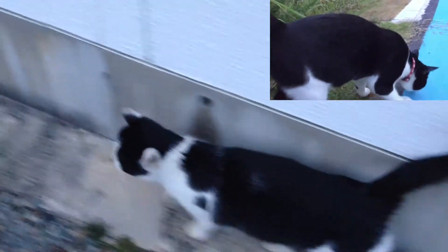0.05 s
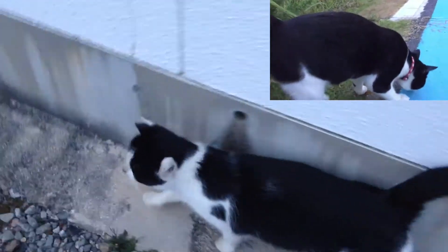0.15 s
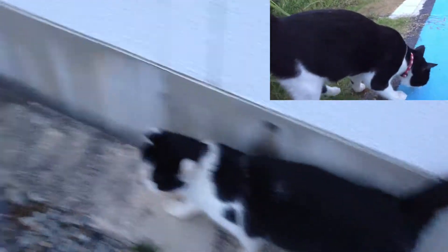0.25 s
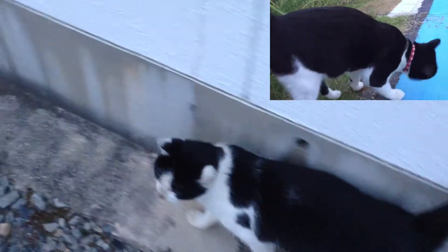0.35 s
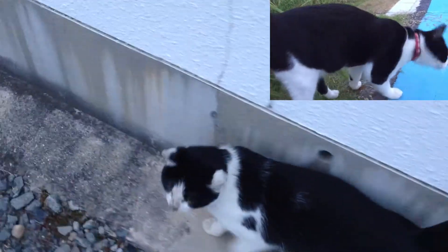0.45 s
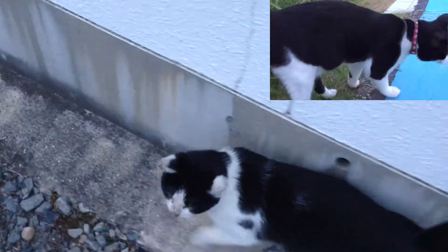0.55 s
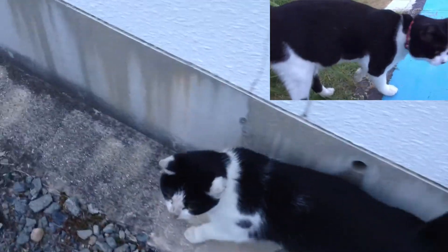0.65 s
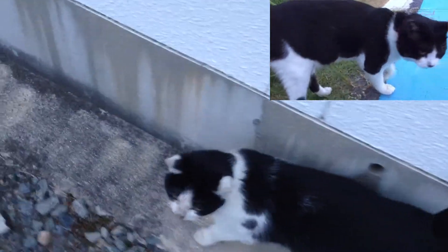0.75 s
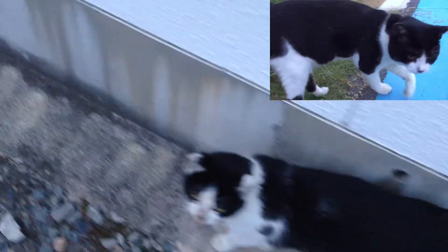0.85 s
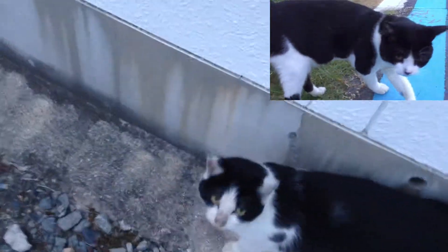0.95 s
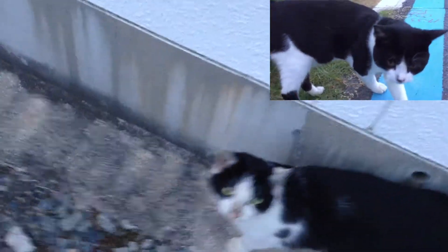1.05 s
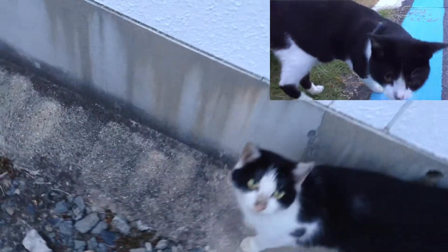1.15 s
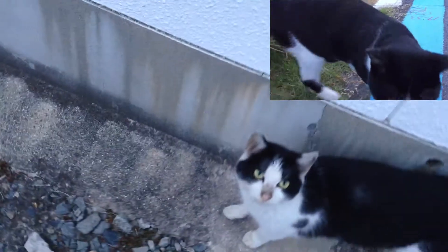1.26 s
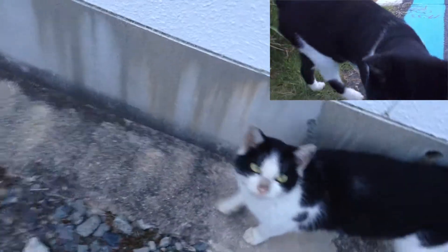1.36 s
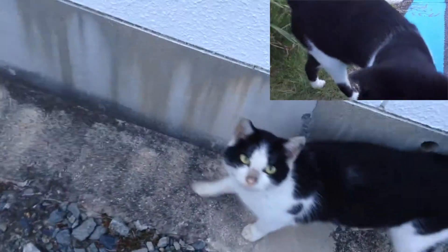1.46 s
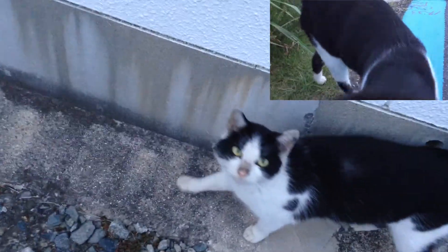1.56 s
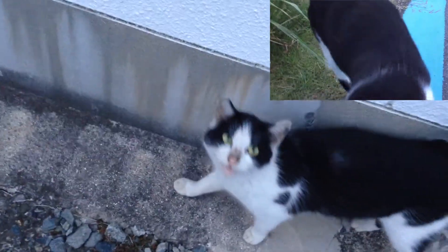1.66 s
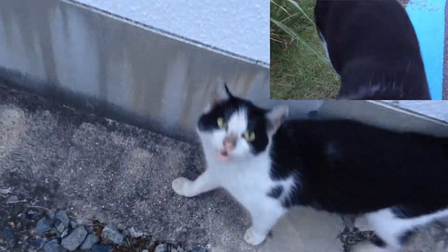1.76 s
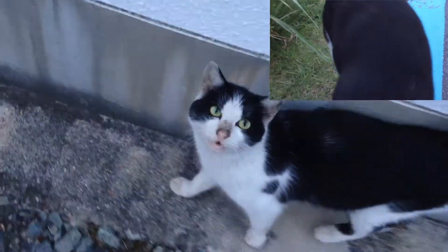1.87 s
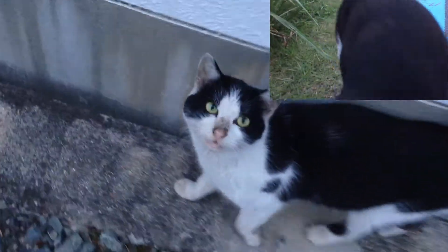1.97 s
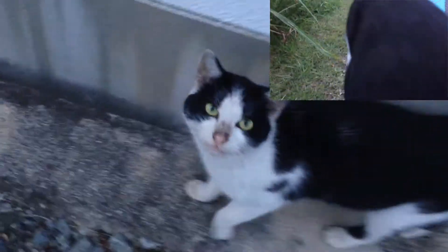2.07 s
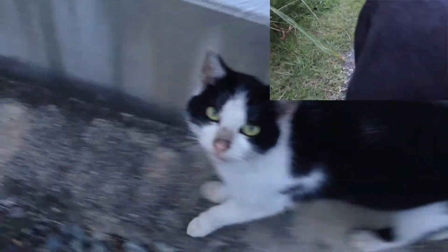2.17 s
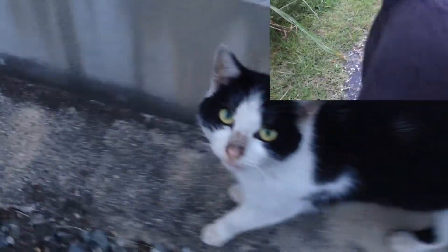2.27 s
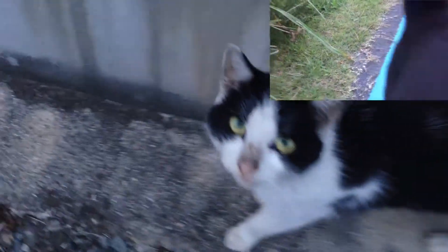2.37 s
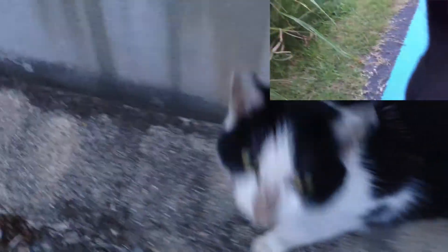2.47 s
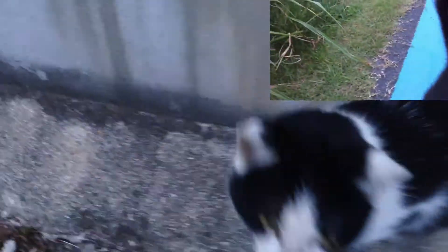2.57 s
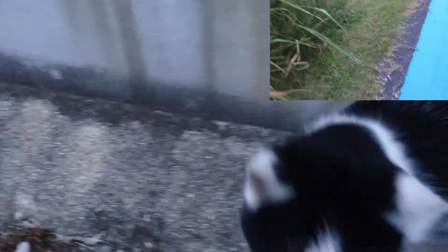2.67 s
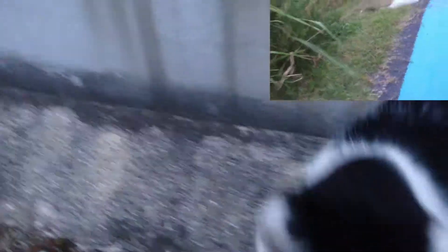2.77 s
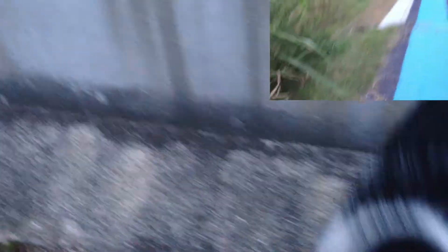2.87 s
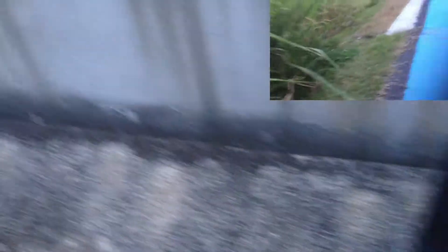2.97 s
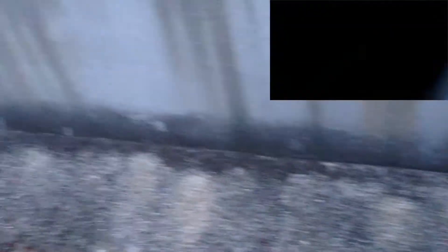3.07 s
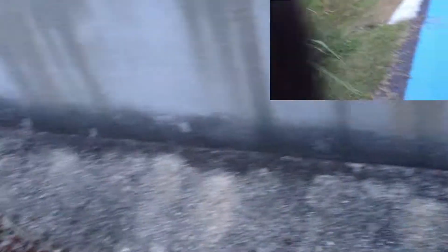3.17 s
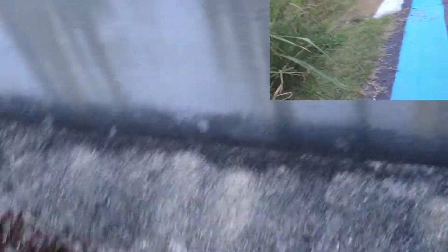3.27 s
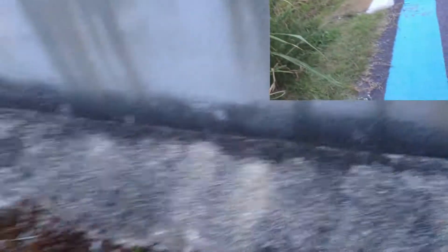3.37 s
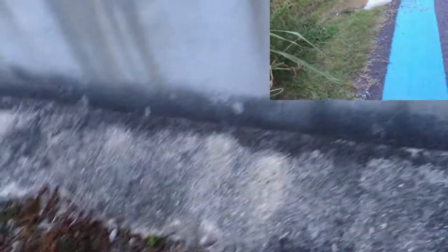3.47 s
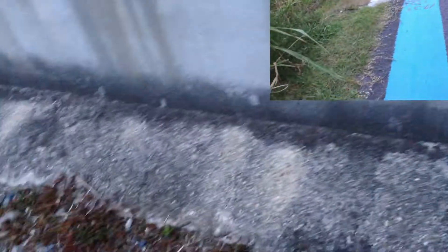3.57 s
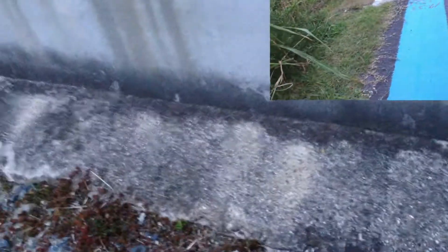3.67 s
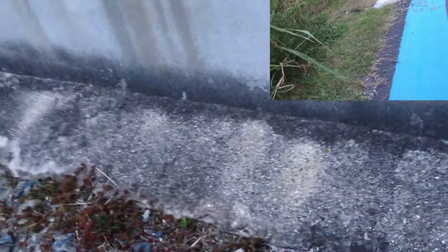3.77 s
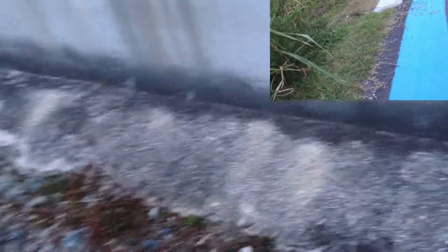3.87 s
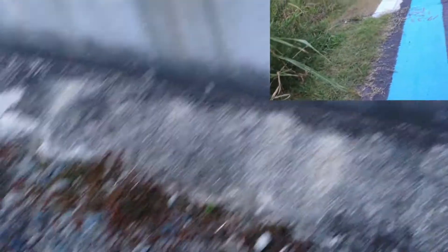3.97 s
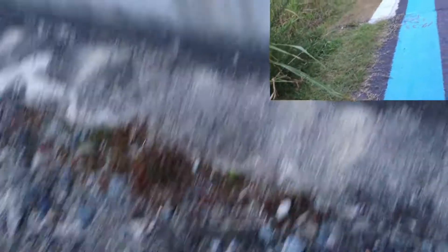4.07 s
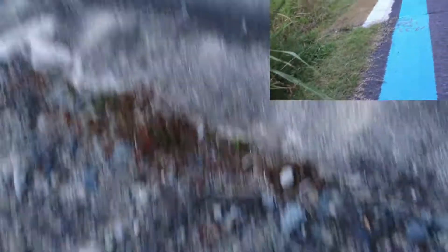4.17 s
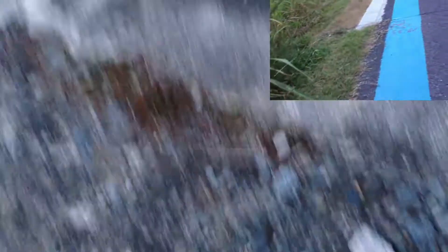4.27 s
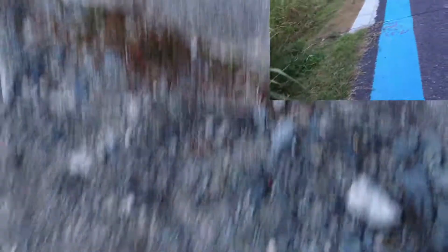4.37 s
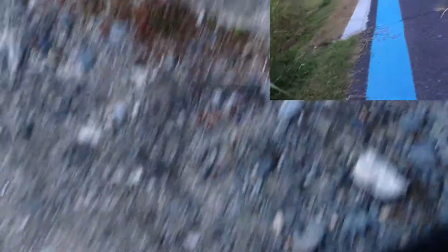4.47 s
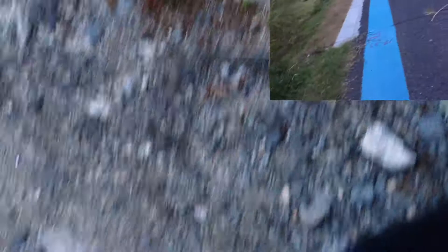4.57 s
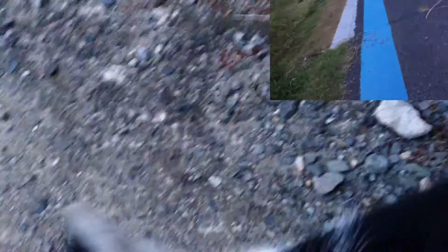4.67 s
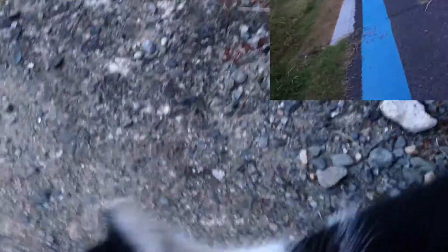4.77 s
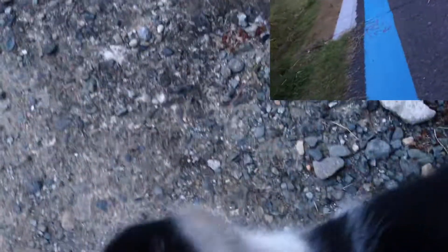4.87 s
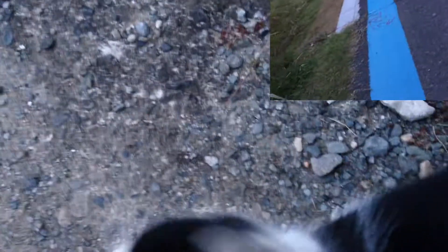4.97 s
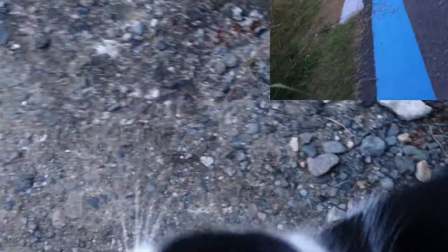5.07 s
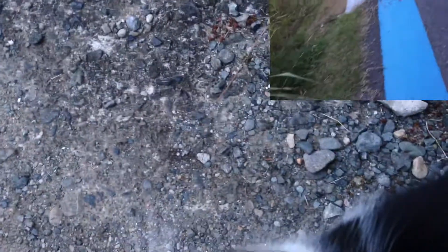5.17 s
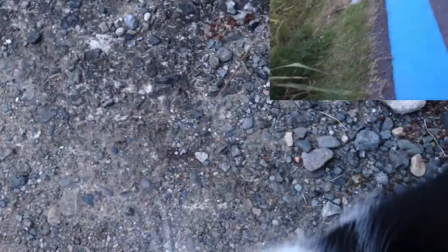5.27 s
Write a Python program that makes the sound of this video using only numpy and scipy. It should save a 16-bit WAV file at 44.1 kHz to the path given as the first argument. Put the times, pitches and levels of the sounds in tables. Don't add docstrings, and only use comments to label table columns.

```python
import sys
import numpy as np
from scipy import signal
from scipy.fft import rfft, irfft
from scipy.io import wavfile
from scipy.ndimage import uniform_filter1d

SR = 44100
rng = np.random.default_rng(int(sys.argv[2]) if len(sys.argv) > 2 else 0)


def to_wav(sig):
    pcm = np.clip(np.atleast_2d(sig), -1, 1) * 32767
    pcm = np.round(pcm).astype(np.int16)
    wavfile.write(sys.argv[1], SR, pcm.T)


def volts_from_decibels(level):
    exponent = np.asarray(level, float) / 20
    return 10 ** exponent


N = 234920

# f/Hz, level/dB per Hz
AIR_SPECTRUM = [(12, -56), (20, -10.5), (86, 2), (248, -6), (434, -16), (1960, -26.5), (2990, -26.5),
                (3740, -21.5), (4300, -34), (4810, -21), (5850, -34.5), (8650, -23), (13500, -28.5),
                (14700, -28.5), (16000, -90)]
# t/s, level/dB
WIND_GUSTS = [(0.0, -50), (0.47, -51.5), (0.77, -56), (1.76, -53), (2.11, -55.5), (2.82, -52), (2.98, -48),
              (3.55, -55.5), (4.11, -51), (4.64, -55), (5.33, -54)]
# f/Hz, width/Hz, level/dB
FAR_INSECTS = (4800, 1270, -68.5)
# t/s, steady level/dB, lower level/dB
TRILL_LEVELS = [(0, -62, -61), (.65, -58, -63), (0.801, -59, -64), (1.5, -59.5, -80), (2.202, -57, -63),
                (2.95, -59.5, -74.5), (3.2, -72, -80), (3.35, -59, -78), (4, -62, -73), (4.6, -56.5, -80),
                (4.76, -66, -83), (4.8, -72, -92), (5.33, -70, -83)]
# start/s, end/s, level/dB
CRICKET_PHRASES = [(0.047, 0.374, -62), (0.577, .87, -61.5), (1.038, 1.382, -62.5), (1.515, 1.807, -61.5),
                   (1.982, 2.314, -63), (2.385, 2.72, -59), (2.874, 3.183, -62.5), (3.308, 3.513, -63),
                   (3.619, 3.944, -65), (4.063, 4.312, -63), (4.405, 4.737, -62.5), (4.848, 5.02, -64.5),
                   (5.141, 5.33, -63)]
# first mid t/s, last mid t/s, count, level/dB, fall/(kHz/s)
UPPER_RUNS = [(.115, .313, 4, -69, 11), (1.159, 1.619, 7, -68, 17), (2.526, 2.526, 1, -73, 20),
              (3.329, 3.65, 5, -63.5, 13), (3.79, 4.048, 5, -66, 11), (4.548, 4.767, 4, -64, 20),
              (4.912, 4.912, 1, -70, 12), (5.007, 5.29, 5, -64, 10)]
# first mid t/s, last mid t/s, count, level/dB, fall/(kHz/s)
LOWER_RUNS = [(.07, .144, 2, -69, 9), (2.535, 2.535, 1, -72, 15), (3.444, 3.709, 4, -62, 10),
              (3.947, 4.04, 2, -70, 9), (4.589, 4.667, 2, -66, 14), (4.878, 4.957, 2, -70, 11),
              (5.15, 5.31, 3, -65, 13)]
# t/s, level/dB, centre f/Hz, width/octaves
SHORT_TICKS = [(0.048, -52, 2820, 0.1), (0.546, -48.5, 2500, 0.72), (0.5472, -37.5, 12800, 0.21),
               (.799, -52, 2420, .2), (0.914, -59, 2630, .4), (1.009, -52.5, 3410, 0.2),
               (1.009, -41, 10700, 0.25), (1.045, -53, 1500, 1.4), (1.088, -49, 10000, 0.25),
               (1.198, -56.5, 1800, 0.59), (1.877, -44.5, 600, 0.79), (2.893, -47, 7900, 1.1),
               (3.0301, -34, 2200, 0.4), (3.0316, -34.5, 3900, 0.3), (3.212, -53, 2800, 0.61),
               (3.226, -56, 2200, 0.2), (3.253, -59, 2200, .46), (3.7, -56, 2000, 1),
               (3.786, -48, 246, 1.1), (3.908, -55, 1790, 1.3), (4.191, -52, 554, .55),
               (4.238, -55.5, 890, 1), (4.313, -51, 880, 0.76), (4.311, -53, 4060, .3),
               (3.981, -60, 2300, .4), (2.826, -55, 1300, .8), (2.803, -58, 2800, .4),
               (3.0315, -47, 800, .4), (3.778, -62, 1100, .7), (3.179, -56, 3300, .8),
               (3.016, -48, 400, .4), (4.15, -60, 2500, 1.1)]
# peak t/s, swell/s, level/dB, centre f/Hz, width/octaves
SOFT_PADS = [(.092, 0.013, -56, 660, 0.94), (2.485, .011, -49, 885, 0.94),
             (3.089, 0.0084, -33.5, 470, 0.43), (3.088, 0.01, -39, 1050, 0.51),
             (3.635, 0.0099, -57.5, 470, 0.85), (3.679, 0.013, -43.5, 277, 0.31),
             (4.631, 0.016, -60.5, 460, .65), (2.96, 0.04, -65, 3000, 0.54), (3.675, .014, -58, 750, .6),
             (3.76, .012, -58, 450, .5), (4.187, .009, -59, 600, .6), (3.762, .01, -69, 2250, .05),
             (.385, .025, -53, 300, .2), (5.0, .07, -67, 5200, .04), (.24, .01, -60, 2250, .15),
             (.848, .006, -61, 2400, .1)]
# t/s, pitch f/Hz, effort level/dB, jaw 0-1, tongue 0-1
FIRST_CALL = [
    (0.0, 331.7, -67, 0.0, 0.0),
    (0.12, 395.5, -65.5, 0.15, 0),
    (0.158, 397.4, -53.5, 0.08, 0.58),
    (0.268, 385.9, -34.5, 0.96, 1.0),
    (0.49, 397, -42.5, 0.74, 0.81),
    (0.682, 382.7, -48.5, 0.52, 0.97),
    (0.877, 373, -52.5, 0.5, 0.63),
    (0.971, 344, -51.5, 0.58, 0.25),
    (1.021, 359, -51, 0.16, 0.34),
]
SECOND_CALL = [
    (1.619, 346.5, -59.3, 0.0, 0.6),
    (1.666, 385, -42, 0.088, 0.45),
    (1.765, 451, -30, 0.87, 0.73),
    (1.864, 436.2, -32, 0.55, 1),
    (1.905, 416.8, -34.6, 0.53, 0.75),
    (2.046, 413.3, -35.5, 0.45, 0.65),
    (2.141, 413, -40, 0.32, 0.41),
    (2.462, 406, -45, 0.29, 0.0),
    (2.504, 330, -64, 0.028, 0.59),
]
FIRST_SHAPES = [(606, 1570, 1405), (80.0, 1300, 100), (1510, 2150, 1548), (180.0, 320, 66),
                (2770, 2840, 2460), (1800, 2950, 1900), (1600.0, 2300, 30)]
SECOND_SHAPES = [(600.0, 1690, 2280), (1160, 200, 1440), (2100, 1296, 2415), (277, 290, 360),
                 (2200.0, 1900, 3560), (2570, 1350, 2260), (150.0, 90.0, 2200)]
FIRST_LEVELS = [(11.5, -10.5, -31.5), (-25, -32, -31)]
SECOND_LEVELS = [(-22.5, 5, -36.5), (-21.5, -26, -22)]
# f/Hz, width/Hz
TOP_RESONANCES = [(5940, 450), (6750, 1800)]
# t/s, width/s, pitch/%, level/dB
VOICE_CATCHES = [(.27, 0.041, 0, -5), (.35, 0.068, 1, 0), (.548, 0.028, -2.2, 1), (.605, 0.0179, 1.7, 3),
                 (.652, 0.014, -1.4, 0.5), (.695, 0.0066, 1.7, 0.5), (.716, 0.0086, -1.2, 1),
                 (.745, 0.025, 1.6, 0.5), (.812, 0.013, -1.2, -3.5), (.872, 0.011, 2, -3.5),
                 (.965, 0.0085, -2.5, 1.5), (.988, 0.0077, 4.5, -0.5), (1.002, 0.0022, -4, -19),
                 (1.709, 0.0046, 1.5, -3), (1.727, 0.005, 2, -9), (1.87, 0.018, -0.4, 1.5),
                 (2.062, 0.012, -.3, 2), (2.086, 0.011, .4, -2), (2.15, 0.02, -1.2, -3),
                 (1.815, .008, 0, 1.5), (1.886, .006, -.5, -2), (2.448, .008, -1.5, -2),
                 (1.775, .02, 0, -1.5)]
# t/s, width/s, f/Hz, level/dB
VOICE_BANDS = [(.25, .1, 2760, -8), (0.38, 0.014, 2440, -10), (.57, 0.043, 1900, -3),
               (1.752, 0.018, 1780, -19), (1.832, 0.016, 2200, -18), (1.87, 0.052, 3540, -18),
               (2.55, .035, 1800, -5), (2.165, 0.022, 1640, -9), (1.66, 0.033, 2120, -13),
               (2.053, 0.11, 1380, -4), (1.85, .04, 5300, -8), (1.9, 0.064, 4000, -5),
               (2.082, 0.016, 2075, -12), (.22, 0.053, 790, -14), (1.706, .011, 2950, 10),
               (1.695, .025, 3260, 8), (1.75, .016, 890, -6), (1.84, .03, 2620, 2.5),
               (1.875, .022, 2980, -5), (2.05, .025, 2900, -6), (2.085, .03, 3320, 12),
               (2.25, .018, 1640, 4), (2.425, .016, 1630, 4), (2.355, .02, 1640, -3), (2.462, .012, 800, 4),
               (2.465, .015, 2000, -6), (2.465, .02, 2780, -12), (2.28, .04, 3290, -8),
               (1.937, .014, 2500, -3), (1.67, .012, 2710, -9), (1.735, .01, 3920, 10),
               (.352, .012, 1975, -18), (.3, .015, 1955, 7), (.3, .02, 2350, -10), (.69, .06, 2300, -12),
               (.35, .04, 1185, -2.5), (.895, .02, 1480, -4), (.65, .03, 380, -8), (2.215, .02, 2060, 2),
               (1.728, .008, 2600, -7), (1.685, .012, 2380, -5), (1.797, .008, 1780, -4),
               (1.815, .014, 2650, 2.5), (1.86, .008, 3450, 12), (1.95, .03, 2920, 3),
               (1.96, .04, 2085, 2.5), (2.395, .03, 2450, -3), (2.48, .012, 2300, -10), (1.94, .04, 6250, 6),
               (1.86, .025, 6900, 6), (1.77, .03, 9350, 8), (2.28, .06, 5750, 6)]
# t/s, peak level/dB, ring time factor
PELLET_HITS = [(0.472, -58, 2.04), (0.519, -41, 0.76), (0.523, -47, 0.6), (0.53, -50, 0.4),
               (0.545, -37, 0.74), (0.5473, -23, 0.5), (0.554, -58, 1.2), (0.577, -41, 0.36),
               (0.586, -41.5, 0.52), (0.5965, -46, 0.3), (0.604, -47, 0.52), (0.683, -50, 1.8),
               (0.695, -49.9, 0.65), (0.768, -53, 0.6), (0.775, -46.3, 0.47), (0.782, -40.5, 0.78),
               (0.798, -39.5, 0.52), (0.803, -42.6, 0.67), (0.809, -52, 1.4), (0.866, -46.5, 1.8),
               (0.877, -49, 0.55)]
# f/Hz, level/dB, t60/s
BELL_MODES = [(6340, 5, 0.041), (6470, -1.5, 0.042), (6960, 5.5, 0.013), (8000, 5, 0.0061),
              (15100, -6, .014)]
# t/s, peak level/dB, f/Hz, t60/s
HARD_SNAPS = [(3.0286, -26, 2200, .013), (3.0292, -34, 1600, .008), (3.0308, -26, 4150, .007),
              (3.0301, -29, 3400, .007), (3.0316, -29, 2700, .006), (3.0812, -27, 650, .02),
              (3.0836, -30, 2900, .008), (3.0885, -29, 1150, .015), (3.0932, -28, 1300, .01),
              (3.1335, -43, 850, .02), (4.3108, -49, 1150, .02), (4.3108, -49, 4100, .012),
              (.5472, -24, 12000, .003), (.5474, -33, 9000, .004), (.548, -32, 13500, .003),
              (.5545, -42, 8000, .004), (1.009, -44, 11500, .006)]
# peak t/s, rise/s, fall/s, level/dB, centre f/Hz
FUR_BRUSHES = [
    (1.08, 0.021, .019, -57, 2000),
    (1.102, 0.0074, .012, -46.5, 2200),
    (3.015, 0.039, 0.044, -50.5, 7550),
    (3.045, .028, 0.023, -43, 8440),
    (3.079, 0.019, .0073, -40, 10400),
    (3.086, 0.007, 0.009, -33, 1300),
    (3.135, 0.016, 0.018, -39, 460),
    (3.149, 0.0075, 0.01, -48.5, 2510),
]
# t/s, level/dB, first f/Hz (negative: pull), glide/s, time to silence/s
BODY_BUMPS = [
    (2.882, -33, 230, .007, .075),
    (3.0928, -17, 650, .0012, .009),
    (3.1425, -34, -50, .02, .04),
    (3.152, -31, 62, .02, .1),
    (3.0988, -17.5, 108, .015, .07),
]


def evened(x):
    return x / np.sqrt(np.mean(x ** 2) + 1e-20)


def add(mix, t_s, sound):
    part = mix[round(t_s * SR):][:len(sound)]
    part += sound[:len(part)]


def wander(size, hz):
    return evened(signal.lfilter(*signal.butter(2, hz, fs=SR), rng.standard_normal(size)))


def band_noise(size, hz, octaves):
    f = np.fft.rfftfreq(size, 1 / SR) + 1
    shape = np.exp(-.5 * (np.log2(f / hz) / octaves) ** 2) / np.sqrt(f)
    return evened(irfft(rfft(rng.standard_normal(size)) * shape, size))


def air():
    frames, hz = N // 256 + 5, np.fft.rfftfreq(1024, 1 / SR)
    real, imag, patches = rng.standard_normal((frames, 513, 3)).T
    patches = uniform_filter1d(patches, size=10, axis=0)
    patches = evened(uniform_filter1d(patches, size=8, axis=1))
    f, db = np.transpose(AIR_SPECTRUM)
    s, wind_db = np.transpose(WIND_GUSTS)
    t = np.arange(frames) * 256 / SR
    low = 1 / (1 + (hz[:, None] / 900) ** 2)
    follow = low + (1 - low) * 0.17
    drift_db = follow * np.interp(t, s, wind_db - wind_db.mean())
    level_hz = hz.clip(max=14900)
    field_db = np.interp(np.log(level_hz + 1), np.log(f + 1), db)[:, None]
    field_db = field_db + drift_db + (1.3 + 1.1 * low) * patches
    spectra = (real + 1j * imag) * volts_from_decibels(field_db)
    bed = evened(signal.istft(spectra, nperseg=1024, noverlap=768)[1][:N])
    bed = signal.lfilter(*signal.butter(3, 38, "high", fs=SR), bed)
    centre, width, insects_db = FAR_INSECTS
    return volts_from_decibels(-54.5) * bed + volts_from_decibels(insects_db) * band_noise(N, centre, width / centre)


def trill(hz, per_s, duty, drop_hz):
    turns = np.cumsum(per_s * (1 + 0.02556 * wander(N, 1.18))) / SR
    u = np.clip(turns % 1 / duty, 0, 1)
    size, start = rng.random((2, 600))[:, turns.astype(int)]
    phase = np.cumsum(hz - drop_hz * (u - .5)) / SR + start + .03 * wander(N, 90)
    level = (1.1 + 0.41 * size) * np.sin(np.pi * u) ** 0.2 * volts_from_decibels(2.0 * wander(N, 110))
    return evened(level * np.sin(2 * np.pi * phase))


def steady_trills():
    t = np.arange(N) / SR
    s, steady_db, lower_db = np.transpose(TRILL_LEVELS)
    steady = volts_from_decibels(np.interp(t, s, steady_db) - 4.5) * trill(4710, 30.5, 0.78, 90)
    lower = volts_from_decibels(np.interp(t, s, lower_db) - 9.5) * trill(4390, 42, 0.99, 39.2)
    return steady + lower


def phrases():
    t = np.arange(N) / SR
    gate, pitch_hz = np.zeros(N), np.full(N, 4895.)
    for start, end, db in CRICKET_PHRASES:
        inside = (t > start) & (t < end)
        gate[inside] = volts_from_decibels(db)
        pitch_hz[inside] -= 110 * np.exp(-(t[inside] - start) / 0.065)
    return uniform_filter1d(gate, size=600) * trill(pitch_hz, 60.5, 0.9, 111)


def chirp_rows():
    rows = []
    for hz, runs in ((3836, UPPER_RUNS), (3613, LOWER_RUNS)):
        for first, last, count, db, fall in runs:
            u = np.linspace(0, 1, round(count))
            off_hz, off_db = rng.standard_normal((2, 9))[:, :len(u)]
            swell_db = 1.5 * (u - .5)
            rows += zip(first + u * (last - first), hz + 40 * off_hz, db + swell_db + off_db, fall + 0 * u)
    return rows


def chirps():
    u, out = np.arange(-900, 900) / SR, np.zeros(N + 900)
    far = rng.random((160, 4)) * (5.3, 500, 6, 8) + (0, 3400, -80, 10)
    for s, hz, db, fall in [*chirp_rows(), *far]:
        level = volts_from_decibels(db + 4.0 + 3.0 * wander(len(u), 150)) * signal.windows.tukey(len(u), .6)
        add(out, s, level * np.sin(2 * np.pi * (hz * u - 500 * fall * u ** 2)))
    return out[900:]


def scuffs(rows):
    t, out = np.arange(-4410, 4410) / SR, np.zeros(N + 4410)
    for s, rise, fall, db, hz, octaves in rows:
        swell = np.where(t < 0, np.exp(-.5 * (t / rise) ** 2), np.exp(-t / fall))
        grain = volts_from_decibels(2 * wander(len(t), 360)) * band_noise(len(t), hz, octaves)
        add(out, s, volts_from_decibels(db) * np.sqrt(np.mean(swell ** 2)) * evened(swell * grain))
    return out[4410:]


def ticks():
    rows = []
    for s, db, hz, octaves in SHORT_TICKS:
        fall_s = 0.0032 / np.sqrt(hz / 1000) * (1 + 0.13 / octaves)
        rows.append((s, 0.43 * fall_s, fall_s, db, hz, octaves))
    return scuffs(rows)


def pads():
    return scuffs([(s, swell, swell, *row) for s, swell, *row in SOFT_PADS])


def pole(f, hz, width):
    return 1 / (1 - (f / hz) ** 2 + 1j * f * width / hz ** 2)


def shaped(rows, jaw, tongue):
    back, front, wide = np.transpose(rows)[:, :, None]
    return (1 - jaw) * ((1 - tongue) * back + tongue * front) + jaw * wide


def meow(rows, mouth, shares, top_resonance):
    s, *columns = np.transpose(rows)
    t = np.arange(s[0], s[-1], 1 / SR)
    hz, effort_db, jaw, tongue = (np.interp(t, s, c) for c in columns)
    hz, effort_db = uniform_filter1d([hz, effort_db], size=1000, mode="nearest")
    jaw, tongue = jaw.clip(0, 1), tongue.clip(0, 1)
    f1, w1, f2, w2, f3, dip, low = np.exp(shaped(np.log(mouth), jaw, tongue))
    hum_db, top_db = effort_db + shaped(shares, jaw, tongue)

    at, width, percent, lift_db = np.transpose(VOICE_CATCHES)[:, :, None]
    waver = np.exp(-.5 * ((t - at) / width) ** 2)
    effort_db = effort_db + (lift_db * waver).sum(0)
    hz = hz * (1 + (percent * waver).sum(0) / 100 + .002 * wander(len(t), 35))

    k = np.arange(1, 25)[:, None]
    f = k * hz
    tract = pole(f, f1, w1) * pole(f, f2, w2) * pole(f, f3, 250) / pole(f, dip, 300)
    tract = tract * f ** 2 / (f ** 2 + low ** 2)
    tract = tract * pole(f, 3340, 400) / pole(f, 3340, 80)
    colour = volts_from_decibels(effort_db) * tract / np.sqrt(.5 * (abs(tract[1:]) ** 2).sum(0))
    colour *= volts_from_decibels(.9 * np.array([wander(len(t), 20) for _ in k]))
    for mid, spell, band_hz, db in VOICE_BANDS:
        if s[0] < mid < s[-1]:
            near_t, near_f = (t - mid) / spell, (f - band_hz) / 154
            colour *= volts_from_decibels(db * np.exp(-.5 * near_t ** 2 - .5 * near_f ** 2))
    colour[0] = np.sqrt(2) * volts_from_decibels(hum_db)

    top_hz, top_width_hz = top_resonance
    flutter_db = 3.0 * np.array([wander(len(t), 8.8) for _ in k])
    top = pole(f, top_hz, top_width_hz) ** 2 * f ** 2 * volts_from_decibels(flutter_db)
    top_db = top_db - 24 * np.exp(-((t - s[0]) / 0.054) ** 4)
    colour += volts_from_decibels(top_db) * top / np.sqrt(.5 * (abs(top) ** 2).sum(0))
    voice = (colour * np.exp(2j * np.pi * k * np.cumsum(hz) / SR)).sum(0).real

    breath = .012 + .8 * np.exp((t - s[-1]) / .015) + .012 * (abs(lift_db) * waver).sum(0)
    breath += .025 * np.clip((hz - 428) / 12, 0, 1)
    rough = 1 + breath * wander(len(t), 900)
    return s[0], voice * rough * signal.windows.tukey(len(t), .03)


def bell():
    t, out = np.arange(4000) / SR, np.zeros(N)
    for s, db, free in PELLET_HITS:
        spread_db, turn = rng.standard_normal((2, len(BELL_MODES)))
        ring = 0 * t
        for (f, mode_db, t60), a, b in zip(BELL_MODES, spread_db, turn):
            ring += volts_from_decibels(mode_db + a - 60 * t / (free * t60)) * np.sin(2 * np.pi * (f * t + 0.31 * b))
        click = band_noise(len(t), 7940, 0.32) * np.exp(-t / 0.00024) * np.tanh(t / 0.000154)
        click = 2 * click / abs(click).max()
        click_share = 0.22 + 3 * volts_from_decibels(db + 19)
        add(out, s, volts_from_decibels(db - 6) * (ring * np.tanh(t / 0.00028) + click_share * click))
    return out


def snaps():
    t, out = np.arange(12000) / SR, np.zeros(N)
    for s, db, hz, t60 in HARD_SNAPS:
        add(out, s, volts_from_decibels(db - 60 * t / t60) * np.tanh(t / .0003) * np.sin(2 * np.pi * hz * t))
    return out


def brushes():
    return scuffs([(*row, 1.78) for row in FUR_BRUSHES])


def bumps():
    t, out = np.arange(12000) / SR, np.zeros(N)
    for s, db, first_hz, glide, silence_s in BODY_BUMPS:
        last_hz = np.sign(first_hz) * max(42, .2 * first_hz)
        hz = last_hz + (first_hz - last_hz) * np.exp(-t / glide)
        add(out, s, volts_from_decibels(db - 60 * (t / silence_s) ** 2) * np.sin(2 * np.pi * np.cumsum(hz) / SR))
    return out


def wall_echo(near):
    t = np.arange(6000) / SR
    tail = rng.standard_normal(len(t)) * volts_from_decibels(-60 * t / 0.41) * (t > .003)
    return volts_from_decibels(-20) * signal.oaconvolve(near, tail / np.linalg.norm(tail))[:N]


def scene():
    cat = np.zeros(N)
    add(cat, *meow(FIRST_CALL, FIRST_SHAPES, FIRST_LEVELS, TOP_RESONANCES[0]))
    add(cat, *meow(SECOND_CALL, SECOND_SHAPES, SECOND_LEVELS, TOP_RESONANCES[1]))
    near = steady_trills() + phrases() + chirps() + cat + bell()
    handling = ticks() + pads() + snaps() + brushes() + bumps()
    return (air() + near + wall_echo(near) + handling)[None]


def top_cut(x):
    return signal.sosfilt(signal.butter(12, 16500, fs=SR, output="sos"), x)


def record(dry):
    edge = signal.firwin(255, 15750, fs=SR)
    mix = signal.oaconvolve(dry, edge[None], "same")
    return top_cut(mix)


dry = scene()
out = record(dry)
to_wav(out)
```